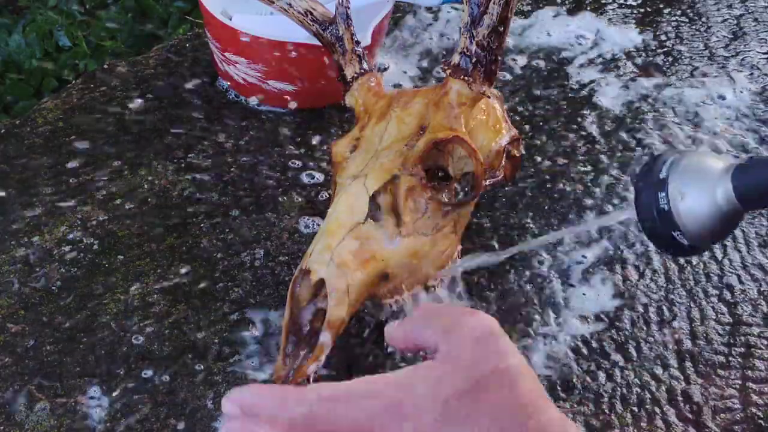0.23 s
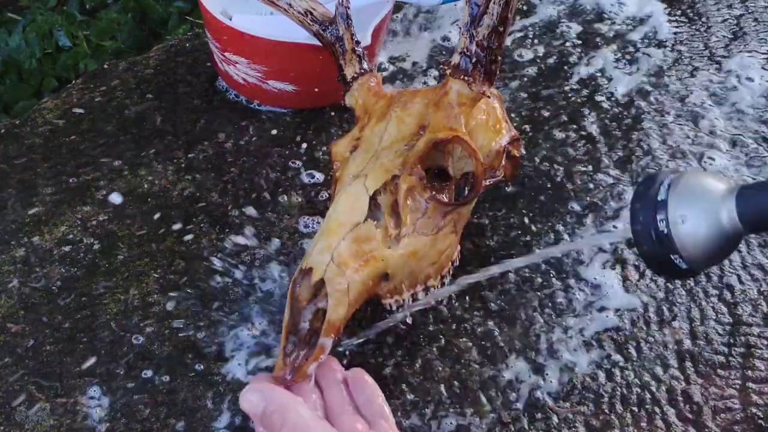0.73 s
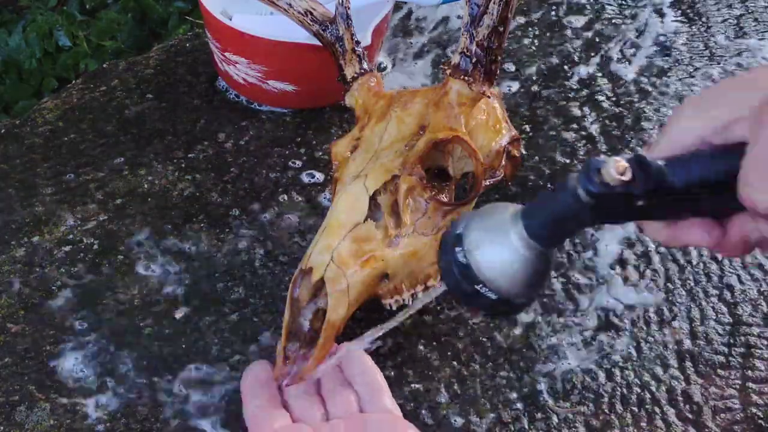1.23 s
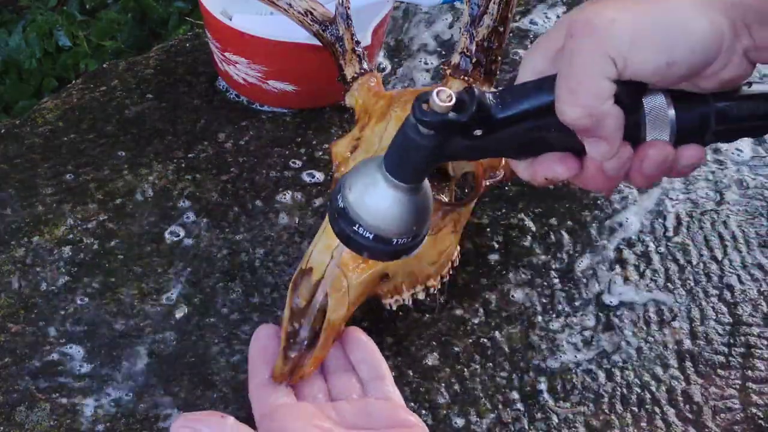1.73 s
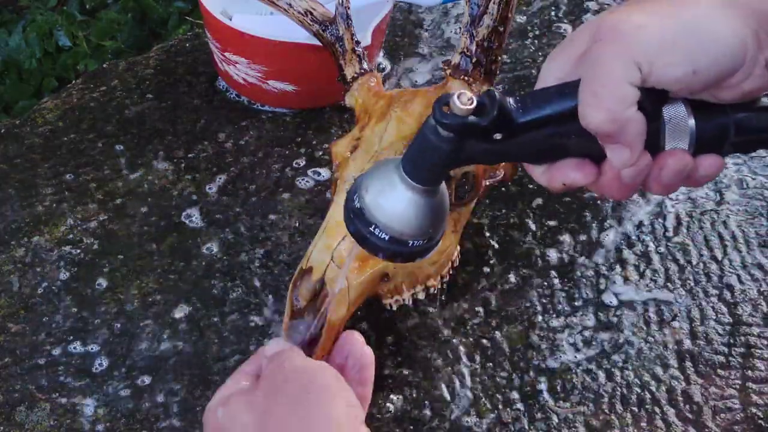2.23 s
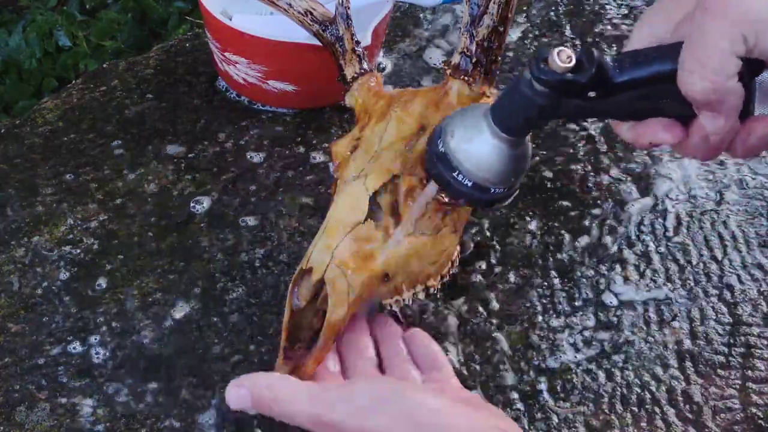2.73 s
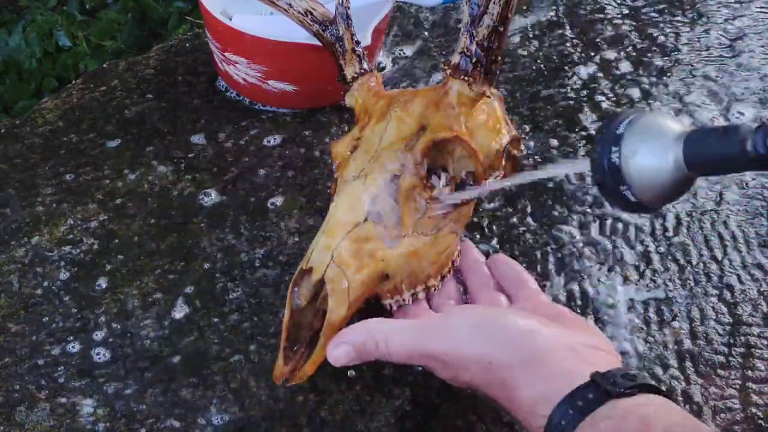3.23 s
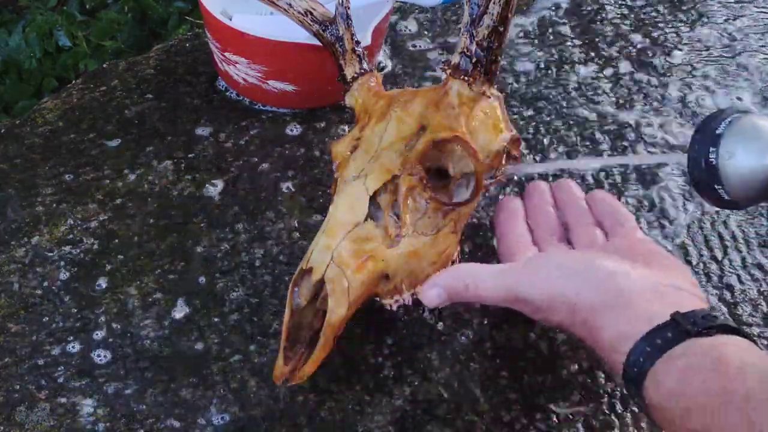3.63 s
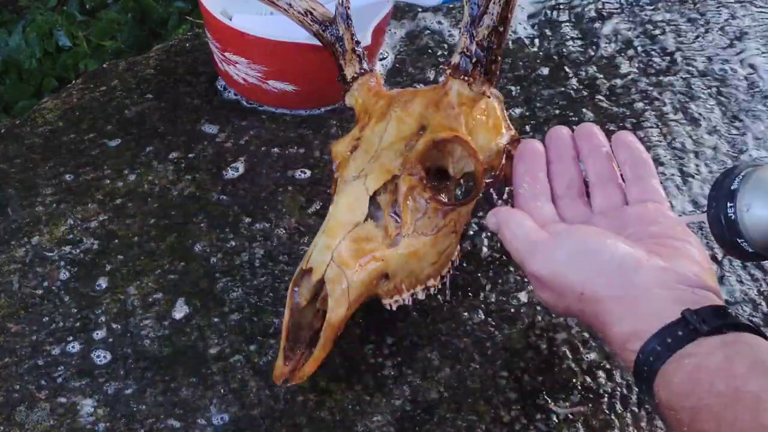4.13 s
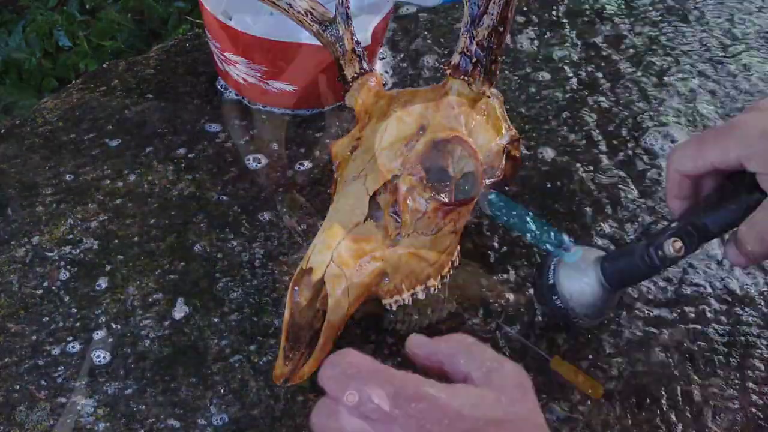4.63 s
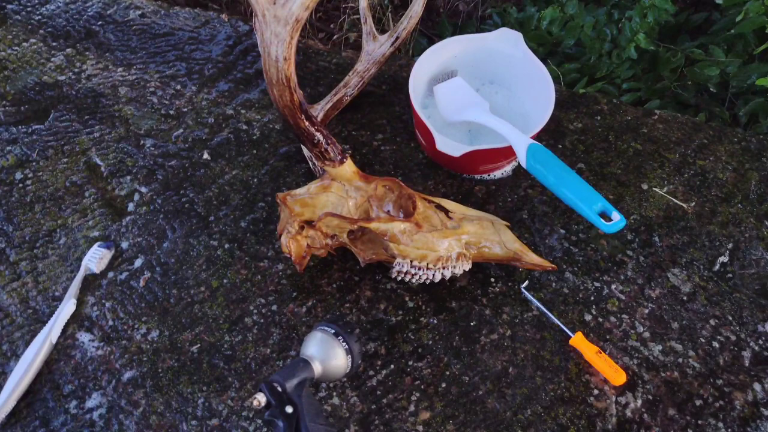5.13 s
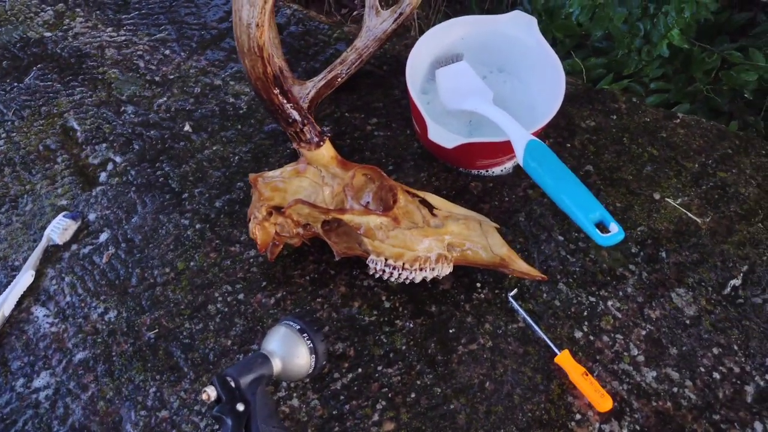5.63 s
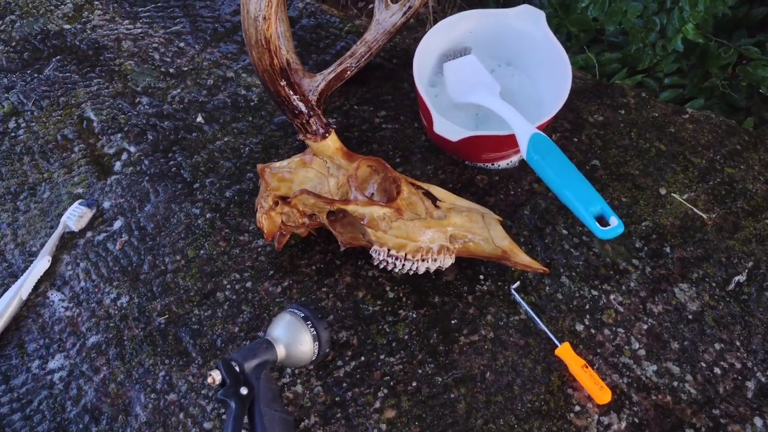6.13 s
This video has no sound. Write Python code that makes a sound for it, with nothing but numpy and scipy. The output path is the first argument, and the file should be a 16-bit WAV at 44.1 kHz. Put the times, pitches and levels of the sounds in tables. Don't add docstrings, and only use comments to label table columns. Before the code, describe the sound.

Water spray splatters on bone and slab with drumming cavities and popping bubbles, then stops, leaving shrill cicadas, stirring leaves and small tool knocks.

```python
import sys
import numpy as np
from scipy import signal
from scipy.fft import rfft, irfft, next_fast_len
from scipy.io import wavfile
from scipy.ndimage import uniform_filter1d

SR = 44100
rng = np.random.default_rng(int(sys.argv[2]) if len(sys.argv) > 2 else 0)


def unload_wav(signal):
    wavfile.write(
        sys.argv[1],
        SR,
        np.round(np.clip(np.atleast_2d(signal).T, -1, 1) * 32767).astype(np.int16),
    )


def natural_amplitude(level_db):
    exponent = np.asarray(level_db, float) / 20
    return 10 ** exponent


N = 281005
TOP_HZ = 15750


def curves(table):
    s, *columns = np.transpose(table)
    return [np.interp(np.arange(N) / SR, s, c) for c in columns]


def unit(x):
    return x / np.sqrt(np.mean(x ** 2))


def sides(pan_db):
    left = 1 / (1 + natural_amplitude(-2 * np.asarray(pan_db)))
    return np.sqrt(2 * np.array([left, 1 - left]))


def on_log(hz, table):
    f, v = np.transpose(table)
    return np.interp(np.log(hz + 1), np.log(f), v)


def shape(x, gain):
    n = next_fast_len(N)
    return irfft(rfft(x, n) * gain(np.arange(n // 2 + 1) * SR / n), n)[..., :N]


def modes(table, order):
    return lambda hz: np.sqrt(sum(natural_amplitude(2 * db) / (1 + (2 * (hz - f) / w) ** 2) ** order for f, w, db in table))


def resonate(noise, table, order=2):
    return unit(shape(noise, modes(table, order)))


def walk(rate):
    k = int(SR / rate)
    steps = np.repeat(rng.standard_normal(N // k + 1), k)
    return 1.2 * uniform_filter1d(uniform_filter1d(steps, k), k)[:N]


def hump(t, rise_s, fall_s):
    return np.exp(-(t / np.where(t < 0, rise_s, fall_s)) ** 2)


def swell(s, rise_s, fall_s):
    return hump(np.arange(N) / SR - s, rise_s, fall_s)


def pair(alike, count=0):
    shared, left, right = rng.standard_normal((3, N))
    alike = np.clip(alike, 0, 1)
    together = np.array([np.roll(shared, count), shared])
    return np.sqrt(alike) * together + np.sqrt(1 - alike) * np.array([left, right])


def add(out, s, burst, pan_db):
    i = int(s * SR)
    burst = np.atleast_2d(burst)[:, :N - i]
    out[:, i:i + burst.shape[1]] += burst * sides(pan_db)[:, None]


# (loudest [s], rise [s], fall [s], idle level [dB], swell [dB])
MOTOR = (5.5, -0.17, 1.3, -83, 14.5)


def motor():
    s, rise_s, fall_s, idle_db, louder_db = MOTOR
    drone = resonate(pair(0.78), [(298, 146, 0), (376, 136, -1)])
    return drone * natural_amplitude(idle_db + louder_db * swell(s, abs(rise_s), fall_s) + 1.5 * walk(7))


# (frequency [Hz], level [dB per Hz])
AIR_COLOUR = [(88, -58), (150, -4.5), (483, -27.5), (2480, -30.5), (2790, -26), (3810, -15), (5100, -7),
              (5740, -6), (6200, 1), (9520, -27), (10500, -34.5), (11800, -32), (15800, -39)]
AIR_DB = -28
# (time [s], half length [s], extra level [dB])
LEAVES = [
    (4.5, 0.11, 0),
    (4.63, 0.076, 2.5),
    (4.747, 0.01, 6),
    (5.044, 0.052, 10.5),
    (5.157, 0.029, 4),
    (5.34, 0.21, 4),
    (5.48, 0.046, 3),
    (5.582, 0.054, 5),
    (5.75, 0.086, 3),
    (6.2, 0.11, 0),
]
LEAVES_DB = -78.5


def air_and_leaves():
    out = 0
    leaves_db = LEAVES_DB + sum(db * swell(s, half_s, half_s) for s, half_s, db in LEAVES)
    ceiling_db = on_log(620, AIR_COLOUR)
    for hz in 180 * 2 ** np.arange(0, 7.):
        bell = lambda f: (np.exp(-(np.log2((f + 1) / hz) / 0.81) ** 2)
                          * natural_amplitude(np.minimum(on_log(f, AIR_COLOUR), ceiling_db)))
        patchy_db = 1.6 if hz < 4000 else .8
        swell_db = leaves_db + 74.0 if 400 < hz < 4000 else -4.0 * (hz < 400)
        octave = shape(pair(min(180 / hz, .6)), bell)
        out = out + octave * natural_amplitude(AIR_DB + swell_db + patchy_db * walk(9))
    return out


# (time [s], peak level [dB], pitch [Hz], left minus right [dB])
GUST_THUMPS = [(0.078, -44.5, 115, 21), (2.184, -45.5, 96, 34), (2.36, -46.5, 74, 26),
               (2.501, -45.5, 92, 21), (2.748, -47, 75, 30), (1.65, -54, 75, -17), (1.7, -56, 70, -4),
               (2.1, -54, 95, -13), (2.534, -50, 77, 12), (2.8, -57, 101, 3), (3.28, -49.5, 81, 17),
               (5.889, -52, 82, -24), (3.378, -44.5, 74, 23), (5.233, -39, 114, -33),
               (5.466, -43.5, 103, -32)]
# (peak time [s], half length [s], level [dB], left minus right [dB])
LONG_GUSTS = [
    (1.7, 0.12, -61.5, -5),
    (1.88, 0.11, -60, -7),
    (2.276, 0.09, -56.5, 13),
    (2.682, 0.33, -59.5, -0.5),
    (3.45, 0.57, -63, -2.5),
    (3.95, 0.41, -73, 5),
    (5.74, 0.35, -58, -17),
    (6.2, 0.33, -68.5, -1),
]
CALM_DB = -70
WAKE_DB, WAKE_RISE_S, WAKE_FALL_S = -18.5, 0.042, 0.092


def wind():
    gusts = [(s, half_s, half_s, db, pan_db) for s, half_s, db, pan_db in LONG_GUSTS]
    wakes = [(s, WAKE_RISE_S, WAKE_FALL_S, db + WAKE_DB, pan_db) for s, db, hz, pan_db in GUST_THUMPS]
    power = natural_amplitude(2 * CALM_DB)
    for s, rise_s, fall_s, db, pan_db in gusts + wakes:
        power = power + (natural_amplitude(db) * sides(pan_db)[:, None] * swell(s, rise_s, fall_s)) ** 2
    rumble = resonate(pair(0.35), [(84.4, 98, 0)]) * np.sqrt(power)
    rumble = rumble * natural_amplitude(1.8 * walk(20))
    t = np.arange(-600, 1800) / SR
    blow = np.exp(-np.where(t < 0, (t / 0.0041) ** 2, t / 0.0081))
    for s, db, hz, pan_db in GUST_THUMPS:
        add(rumble, s - 600 / SR, natural_amplitude(db + 5.5) * np.cos(2 * np.pi * hz * t) * blow, pan_db)
    return shape(rumble, lambda f: f ** 2 / (f ** 2 + 35.0 ** 2))


TREE_LAG = 2


def singers(pulse_hz, body, depth):
    gate = 1
    for k in range(2):
        phase = np.cumsum(pulse_hz * (1 + .012 * k + 0.008 * walk(4.3)) / SR) % 1
        gate = gate + depth / (k + 1) * np.exp(-phase)
    song = resonate(pair(0.26, count=TREE_LAG) * gate, body)
    return song * natural_amplitude(0.85 * walk(7.3) + 0.43 * walk(20))


# (time [s], high singers [dB], low singers [dB], thin singers [dB], left minus right [dB])
CHORUS_EFFORT = [
    (4.3, -69, -67, -72, 7),
    (4.39, -55, -58.5, -55, 5),
    (4.5, -52, -57.5, -49.5, 5.5),
    (4.8, -46, -55, -48.5, 4.5),
    (5.15, -43.5, -51.5, -47, 4),
    (5.45, -40, -46, -48.5, 1.5),
    (5.95, -42.5, -44.5, -52, 3.5),
    (6.37, -44.5, -45, -50, 2.5),
]
# (frequency [Hz], width [Hz], level [dB])
HIGH_BODY = [(6196, 116, -1), (6040, 82, -1.5), (6440, 120, -3), (6675, 130, -5), (5600, 520, -12.5)]
LOW_BODY = [(4806, 280, 2), (4055, 320, -2.5), (4384, 140, 1), (5100, 760, -0.5), (3500, 680, -7),
            (2922, 240, -9)]
THIN_BODY = [(7280, 500, 0), (7760, 440, -3), (8370, 300, -9.5), (9120, 410, -11), (9540, 660, -17)]
CHORUS_UNDER_SPRAY_DB = -64.5


def cicadas():
    faint = (CHORUS_UNDER_SPRAY_DB, CHORUS_UNDER_SPRAY_DB - 0.5, CHORUS_UNDER_SPRAY_DB - 28, 6)
    high_db, low_db, thin_db, pan_db = curves([(0, *faint), (4.29, *faint)] + CHORUS_EFFORT)
    high = singers(213, HIGH_BODY, 0.52) * natural_amplitude(high_db)
    low = singers(172, LOW_BODY, 1.05) * natural_amplitude(low_db + 1.0)
    thin = singers(230, THIN_BODY, 2.9) * natural_amplitude(thin_db)
    return (high + low + thin) * sides(pan_db)


# (pitch [Hz], level [dB], loudest [s], half length [s])
NEAR_INSECTS = [(6180, -56, 5.2, .5), (6175, -55, 5.7, .25), (6410, -58, 5.45, .4), (6540, -60, 5.0, .3),
                (6610, -60, 6.2, .3), (4783, -60, 5.7, .35), (4865, -60, 6.1, .3), (4695, -63, 6.2, .3),
                (4485, -64, 6.15, .31), (4066, -62, 5.8, .4), (5363, -63, 5.45, .3), (5200, -65, 4.9, .35),
                (2940, -69, 5.9, .4), (7300, -65, 6.2, .25), (7880, -67, 5.1, .4), (3790, -67, 5.9, .3),
                (5540, -64, 6.0, .25), (1720, -82, 5.57, .05), (1270, -81, 6.2, .04), (900, -81, 5.74, .04)]
SOLO_WAVER_HZ, SOLO_FLUTTER_DB = 28, 4.0


def soloists():
    out, t = 0, np.arange(N) / SR
    waver = [walk(60) for _ in range(4)]
    flutter = [walk(25) for _ in range(4)]
    for k, (hz, db, s, half_s) in enumerate(NEAR_INSECTS):
        left_bend = waver[k % 4]
        right_bend = .6 * left_bend + .8 * waver[(k + 1) % 4]
        bend = np.roll(np.array([left_bend, right_bend]), 9000 * k, axis=1)
        note = np.sin(2 * np.pi * np.cumsum(hz + SOLO_WAVER_HZ * bend, axis=1) / SR)
        level_db = db + SOLO_FLUTTER_DB * np.roll(flutter[k % 4], 7000 * k)
        out = out + note * natural_amplitude(level_db) * swell(s, half_s, half_s)
    return out * (t > 4.36)


# (first pulse [s], period [s], pitch [Hz], width [Hz], first level [dB], rise [dB per s], half length [s])
LOW_THROB = (5.902, .0675, 2250, 520, -71.5, 8, .009)


def throbbing_insect():
    first_s, period_s, hz, width_hz, db, rise_db, half_s = LOW_THROB
    since = np.arange(N) / SR - first_s + period_s / 2
    beats = (since > 0) * np.exp(-((since % period_s - period_s / 2) / half_s) ** 2)
    return resonate(pair(0.73), [(hz, width_hz, 0)], order=4) * beats * natural_amplitude(db + rise_db * since)


def ring(hz, ring_s):
    t = np.arange(2000) / SR
    glide = np.sin(2 * np.pi * hz * t * (1 + 8 * t))
    wave = glide * np.exp(-np.log(1000) * t / ring_s) * (1 - np.exp(-t / 0.001))
    return wave / np.abs(wave).max()


# (time [s], peak level [dB], colour [Hz], ring [s], left minus right [dB])
TOOL_SNAPS = [
    (5.021, -51, 1450, 0.0028, 3),
    (5.201, -42, 1350, 0.003, 4),
    (5.201, -50, 610, 0.0084, 4),
    (5.569, -43.5, 850, 0.0011, 1.0),
    (4.875, -59.5, 260, .03, 0),
    (5.1, -62.5, 230, 0.024, 0),
]


def tool_snaps():
    out = np.zeros((2, N))
    for s, db, hz, ring_s, pan_db in TOOL_SNAPS:
        add(out, s, ring(hz, ring_s) * natural_amplitude(db), pan_db)
    return out


# (time [s], peak level [dB], pitch [Hz], left minus right [dB])
BUBBLE_POPS = [(0.044, -42, 563, -2), (0.058, -44, 600, 0.5), (0.072, -42.5, 610, -2),
               (0.549, -46.5, 965, -8), (0.1, -43, 960, -7), (0.314, -39, 1980, 4), (0.344, -51, 630, 1),
               (0.544, -46, 623, -2.0), (0.654, -56, 560, -1.0), (0.744, -55, 528, -1.5),
               (0.773, -53, 506, -1.0), (0.81, -46.5, 930, -5), (0.962, -52.5, 540, 2),
               (0.99, -49.5, 2150, -0.5), (1.181, -54, 990, -6), (2.908, -47, 1270, -7),
               (3.417, -48, 1430, -1.0), (3.492, -41, 641, 0.0), (3.512, -39.5, 2480, 0.0),
               (3.668, -54, 544, 2), (3.561, -36.5, 663, -0.5), (3.574, -42, 640, 0),
               (3.591, -36.5, 610, -2), (4.742, -51, 1490, 4), (.146, -53, 635, 0), (0.174, -52, 1420, 2),
               (.249, -52, 860, 0), (.47, -51, 895, -4), (0.497, -55, 848, -3), (.639, -54, 1440, -4),
               (.675, -51, 1250, 0), (1.162, -58, 912, 0), (2.183, -54, 1060, 0), (2.877, -56, 1460, 9),
               (2.964, -48, 1200, 0), (2.999, -46, 1380, 0), (3.33, -53, 1780, 0), (3.395, -56, 1440, 0),
               (3.47, -46.5, 571, 0), (3.531, -41, 1510, 0), (3.694, -49, 657, 0), (3.751, -49, 1420, 0),
               (3.811, -48, 653, 0), (5.146, -60.5, 1010, -0.5), (5.315, -56, 802, -6),
               (5.366, -53, 860, -19), (5.458, -58, 837, -13)]


def bubble_pops():
    out = np.zeros((2, N))
    for s, db, hz, pan_db in BUBBLE_POPS:
        add(out, s, ring(hz, 16.6 / hz) * natural_amplitude(db), pan_db)
    return out


# (start [s], end [s], from [Hz], to [Hz], width [Hz], level [dB])
GROOVE = (2.04, 2.21, 3200, 2200, 500, -56)


def groove_swish():
    start, end, from_hz, to_hz, width_hz, db = GROOVE
    way = np.clip((np.arange(N) / SR - start) / (end - start), 0, 1)
    flutter = resonate(pair(0.93), [(0, width_hz, 0)])
    carrier = np.cos(2 * np.pi * np.cumsum(from_hz + (to_hz - from_hz) * way) / SR)
    return flutter * carrier * np.sqrt(np.abs(np.sin(np.pi * way))) * natural_amplitude(db)


# (time [s], peak level [dB], colour [Hz])
BIG_DROPS = [(0.1351, -31, 9480), (0.2967, -28, 8810), (0.3052, -25, 11000), (0.3252, -27, 8590),
             (0.5422, -29, 14600), (0.7307, -30, 12100), (0.819, -25, 13500), (0.8535, -31, 10200),
             (0.8535, -32, 5600), (1.0415, -31, 10900), (1.2645, -24, 14600), (1.5863, -23, 10700),
             (1.6057, -34, 9190), (2.0043, -35, 11100), (2.2119, -24, 14000), (2.9133, -34, 9360),
             (3.1487, -29, 9340), (3.3298, -33, 8990), (3.4096, -33, 10100), (3.464, -25, 12400),
             (3.482, -27, 8750), (3.5119, -26, 10500), (3.5409, -18, 11000), (3.5723, -21, 7920),
             (3.6047, -21, 10000), (3.6376, -24, 14600), (3.7085, -30, 9040), (3.8097, -28, 14700),
             (3.8387, -26, 13200), (4.0796, -24, 11500),
             (3.559, -38, 2000), (3.59, -59, 2600), (3.417, -43, 2520), (.195, -45, 3400),
              (.644, -35, 6200), (.766, -39.5, 3340), (1.288, -49, 3030), (1.489, -44, 5600),
              (2.185, -45, 2800), (2.385, -47, 3300), (3.15, -40, 5400), (3.81, -46, 3500),
              (.305, -37, 5960), (0.326, -48, 6060), (.544, -50, 2400), (0.82, -31, 5430),
              (3.514, -38, 3000), (3.571, -35, 4500), (3.606, -35, 5600), (1.606, -41, 5200),
              (1.781, -39, 3100), (3.773, -38, 3200)]
EVEN_DROPS = [.0228, .1725, .5207, .7592, .7886, .9343, 1.2396, 1.497, 1.7923, 2.0986, 2.5331, 2.5556,
              2.5765, 2.7472, 2.7901, 3.0006, 3.7005]
EVEN_DROP_DB, EVEN_DROP_HZ = -33, 13800


def drop_cracks(jet_pan_db):
    out, t = np.zeros((2, N)), np.arange(2000) / SR
    small = [(s, EVEN_DROP_DB, EVEN_DROP_HZ) for s in EVEN_DROPS]
    for s, db, hz in BIG_DROPS + small:
        sos = signal.butter(2, [0.8 * hz, min(1.07 * hz, TOP_HZ)], "bandpass", fs=SR, output="sos")
        tail = unit(signal.sosfilt(sos, rng.standard_normal((2, 2000))))
        tail = tail * (t > .0008) * np.exp(-t / 0.002)
        snap_hz = min(.7 * hz + 4300, 1.2 * hz)
        snap = np.sin(2 * np.pi * snap_hz * t) * np.exp(-((t - .0009) * hz / 1.5) ** 2)
        add(out, s, (snap + 0.49 * tail) * natural_amplitude(db + 0.85), jet_pan_db[int(s * SR)])
    return out


def patter(rate, spread_db, tail_s):
    sizes_db = np.minimum(spread_db * rng.exponential(size=N), 3.6 * spread_db)
    hits = (rng.random(N) < rate / SR) * natural_amplitude(sizes_db)
    return unit(signal.lfilter([1], [1, -np.exp(-1 / (tail_s * SR))], hits))


def under_hits(db, knee_db):
    return np.minimum(db, (db + knee_db) / 2)


# (frequency [Hz], width [Hz], level [dB])
SKULL_CAVITIES = [(528, 90, 3.5), (617, 150, 1.5), (860, 550, -1.5)]


def bone(boom_db, whistle_db, lumps):
    drum = pair(0.71) * np.sqrt(1 + 1.8 * lumps ** 2)
    boom = resonate(drum, SKULL_CAVITIES) * natural_amplitude(under_hits(boom_db, -46) - 0.5)
    boom = boom * natural_amplitude(1.8 * walk(25))
    whistle = resonate(pair(0.98), [(1432, 165, 0)]) * natural_amplitude(whistle_db + 0.63 * walk(11.0))
    return boom + whistle


# (frequency [Hz], level [dB per Hz])
SPRAY_COLOUR = [(590, -30), (1000, -8), (1290, -6), (1410, -7.5), (1680, -7.5), (2190, -8.5), (3400, -1.5),
                (4140, -7.5), (6200, -6.5), (7200, -11.5), (7720, -4.5), (8870, 0.5), (13300, 1),
                (15100, 1), (15800, 8)]
# (frequency [Hz], left minus right [dB])
SPRAY_LEAN = [(60, 1.5), (110, 1.5), (200, 0.0), (380, 0.0), (700, -31), (1290, 1.5), (2380, -1.5),
              (4400, 0), (8120, -2.5), (15000, 2)]
JET_LAG = -1


def spray(fine_db, splatter_db, pan_db, lumps):
    out, surge = 0, walk(7.9)
    showers = [lumps, patter(700, 3.2, .001), patter(800, 3.8, .0006),
               patter(800, 3.2, .0005), patter(700, 4.6, .0005)]
    for hz in 1100 * 2 ** np.arange(0, 4.05, .4):
        height = np.clip(np.log2(hz / 2500) / 0.84, 0, 1)
        drops = showers[int(np.log2(hz / 1100) * 1.2)]
        noise = pair(.65 - 0.36 * height, count=JET_LAG * (hz > 3000))
        noise = noise * np.sqrt(1 + (.5 + 0.13 * height) * drops ** 2)
        bell = lambda f: np.exp(-(np.log2((f + 1) / hz) / 0.36) ** 2) * natural_amplitude(on_log(f, SPRAY_COLOUR))
        mist_db = under_hits(fine_db, -46) + .1
        slab_db = under_hits(splatter_db, -59.5) + 8.5
        db = height * mist_db + (1 - height) * slab_db
        db = db + (.4 + .6 * height) * surge + 1.3 * walk(16) + .5 * walk(6)
        out = out + shape(noise, bell) * natural_amplitude(db) * sides(on_log(hz, SPRAY_LEAN) + height * pan_db)
    return out * natural_amplitude(5)


# (time [s], extra mist [dB], extra splatter [dB])
JET_SPURTS = [(0.073, 6, 0.0), (0.141, -1, -1), (0.254, 1, -1.5), (0.302, -2, 3.5), (0.328, -1, -5),
              (0.445, 1.5, 0), (0.525, 1, -0.5), (0.547, 8, 2), (0.645, 7, 2.5), (0.679, 3.0, -4),
              (0.771, -2, 1), (0.788, 7, 10), (0.824, 4, 3.5), (0.858, 9, -2), (0.933, 2, 0.0),
              (1.047, 4, 0.5), (1.24, -2, -5), (1.262, -1, -7), (1.335, 3.5, 16), (1.409, 1, 4),
              (1.501, 4, 6), (1.517, 2, -5.5), (1.591, -5, -4), (1.608, 0, 4.5), (1.747, 5, 0.5),
              (1.779, 2, 2), (1.795, 4.0, 1.0), (1.83, 4, 9), (1.903, 1.5, 4.5), (1.927, 2, 3.5),
              (2.006, 2, 6), (2.103, 0, 3), (2.217, 0, 6), (2.291, 5, 4), (2.385, 3, 3.0), (2.559, -2, 2),
              (2.581, 3, 4), (2.692, 3.5, 4), (2.796, 3, 0.5), (2.883, 3, -1), (2.913, 3, 8),
              (3.014, 1.5, 4), (3.03, 0, 1.5), (3.148, -6, 3.5), (3.245, 5, 9), (3.268, 4, 0.0),
              (3.334, 3, 5), (3.464, 2, -2), (3.486, 2, -1.0), (3.512, -3, 12), (3.546, 6, 0),
              (3.576, 3, 8.0), (3.603, 15, -2), (3.637, 2.5, -1.0), (3.713, 3.5, 8), (3.776, 3, -2),
              (3.81, 11, -4), (3.843, 13, -9), (4.065, 7, -6), (4.085, 4, 1.0)]
SPURT_RISE_S, SPURT_FALL_S, SPURT_SHARE = 0.0045, 0.0099, 0.41


def spurts():
    marks, t = np.zeros((2, N)), np.arange(-1500, 1501) / SR
    for s, *db in JET_SPURTS:
        marks[:, int(s * SR)] = db
    spit = hump(t, SPURT_RISE_S, SPURT_FALL_S)
    return SPURT_SHARE * signal.fftconvolve(marks, spit[None], mode="same", axes=1)


# (time [s], mist [dB], share caught by the cavities [dB], nozzle whistle [dB], left minus right [dB])
JET_AIM = [(0, -49, -16.5, -71, 1.5), (.45, -47.5, -17.5, -69.5, 1.5), (.8, -49, -16, -67.5, 2.5),
           (.92, -49, -27, -78, 1.5), (1.3, -50, -20, -67.5, 3), (1.7, -51, -22, -76, 3.5),
           (2.1, -50.5, -23.5, -74, 3), (2.7, -51.5, -17.5, -70, 2), (3.0, -49.5, -16.5, -63, 3),
           (3.4, -48, -15, -63.5, 1.5), (3.48, -42, -14, -66, 1), (3.61, -39, -24.5, -63, 1),
           (3.66, -46.5, -18.5, -61.5, 2), (3.82, -45.5, -14, -68, 2), (4.0, -49.5, -24, -65.5, 1),
           (4.2, -51.5, -30.5, -66.5, 2.5), (4.36, -52.5, -29, -80, 2.5)]
# (time [s], extra mist [dB], extra boom [dB], extra splatter [dB])
EDGE_SPLASHES = [(0.064, -0.5, 15, 6), (.26, -0.5, 2, 0), (.32, 1, 4, 2.5), (.36, -1.5, 1.5, -0.5),
                 (.47, -1, -4.5, -1.5), (.55, -2.5, 0, -4), (.67, 3.5, 3.5, 9), (.77, 1.5, 7.5, 5),
                 (.83, 1, -3, -5), (0.968, -.5, 17, 6), (1.19, -1, 9, 1), (1.27, 0, -5, 1.5),
                 (1.6, 1.5, 1, -1), (1.65, -1, 6, -2), (1.72, -1.5, 8, -1), (1.79, -1.5, 6, 2.5),
                 (1.9, 2.5, 10, 4.5), (2.15, -3, 1, 10), (2.25, 0, 8, 1), (2.37, 1, 1.5, 2),
                 (2.8, -0.5, .5, 7), (2.89, -0.5, 5, 13), (2.95, -0.5, 6, 3), (3.01, -0.5, 1.5, 9),
                 (3.15, 3, -5, 11), (3.269, 0.5, 2.5, 17), (3.34, 1.5, 0.5, 6), (3.43, 0, -1, 2),
                 (3.48, -2, 5, -3), (3.53, -1.5, 0.5, 8), (3.579, -1, 18.5, 22), (3.71, 2, 4, -1),
                 (4.03, 2, -1, -4)]
SPLASH_RISE_S, SPLASH_FALL_S = 0.026, 0.026
SLAB_DB, SLAB_SHARE = -3, 0.54


def scene():
    fine_db, caught_db, whistle_db, pan_db = curves(JET_AIM)
    splash_mist_db, splash_boom_db, splash_slab_db = sum(
        np.array(db)[:, None] * swell(s, SPLASH_RISE_S, SPLASH_FALL_S) for s, *db in EDGE_SPLASHES)
    spit_mist_db, spit_slab_db = spurts()
    boom_db = fine_db + caught_db + splash_boom_db
    mist_db = fine_db + splash_mist_db + 2 * spit_mist_db
    splatter_db = fine_db + SLAB_DB + SLAB_SHARE * caught_db + splash_slab_db + 2 * spit_slab_db
    lumps = patter(260, 3.2, .003)
    water = spray(mist_db, splatter_db, pan_db, lumps) + bone(boom_db, whistle_db, lumps)
    water = water * np.clip((4.385 - np.arange(N) / SR) / 0.046, 0, 1)
    knocks = drop_cracks(pan_db) + bubble_pops() + tool_snaps()
    insects = cicadas() + soloists() + throbbing_insect()
    return water + groove_swish() + knocks + insects + wind() + air_and_leaves() + motor()


# (frequency [Hz], width [Hz], from [s], to [s], rarity [walk spreads])
CENTRE_GAPS = [(7150, 330, .6, 4.3, .1), (4200, 200, .2, 4.2, .9), (6000, 150, 1.5, 4.2, 1.2),
               (2450, 180, 4.5, 6.4, .5), (1850, 170, 4.7, 6.4, .6), (1620, 130, 4.7, 6.4, .9),
               (1250, 130, 4.7, 6.1, .9), (3080, 120, 5.2, 6.4, .8), (10300, 500, 4.4, 6.4, .7)]


def dropouts(x):
    t, lost = np.arange(N) / SR, 0
    for hz, width_hz, from_s, to_s, rarity in CENTRE_GAPS:
        band = shape(x.mean(axis=0), lambda f: np.exp(-(2 * (f - hz) / width_hz) ** 8))
        gone = np.clip(4 * (walk(30) - rarity), 0, 1)
        lost = lost + band * gone * (t > from_s) * (t < to_s)
    return x - lost


def top_cut(x):
    return signal.sosfilt(signal.butter(12, 17090, fs=SR, output="sos"), x)


# (delay [s], level [dB])
SLAB_ECHOES = [(.0022, -23.5), (0.0017, -41)]
DIP_S, DIP_FADE_S, DIP_DB = .1808, 0.013, -35


def record(dry):
    heard = np.array([x + natural_amplitude(db) * np.roll(x, int(s * SR)) for x, (s, db) in zip(dry, SLAB_ECHOES)])
    since = np.arange(N) / SR - DIP_S
    fade = np.where(since < 0, 1, np.clip(natural_amplitude(DIP_DB) + since / DIP_FADE_S, 0, 1))
    low_pass = signal.ellip(10, .2, 55, TOP_HZ, fs=SR, output="sos")
    mix = dropouts(signal.sosfilt(low_pass, heard * fade))
    return top_cut(mix)


dry = scene()
out = record(dry)
unload_wav(out)
```